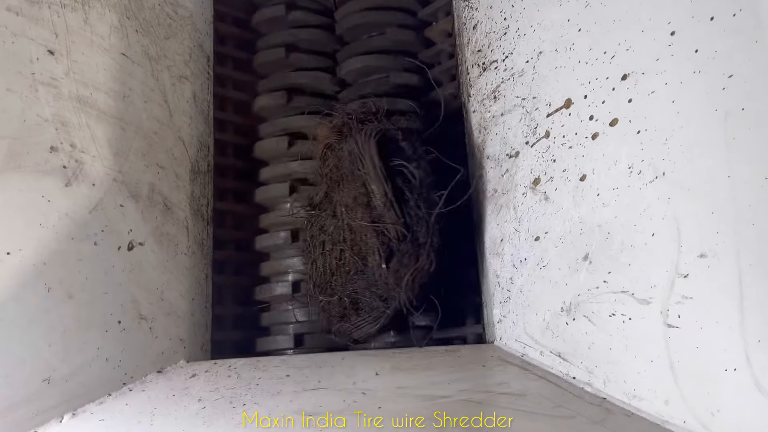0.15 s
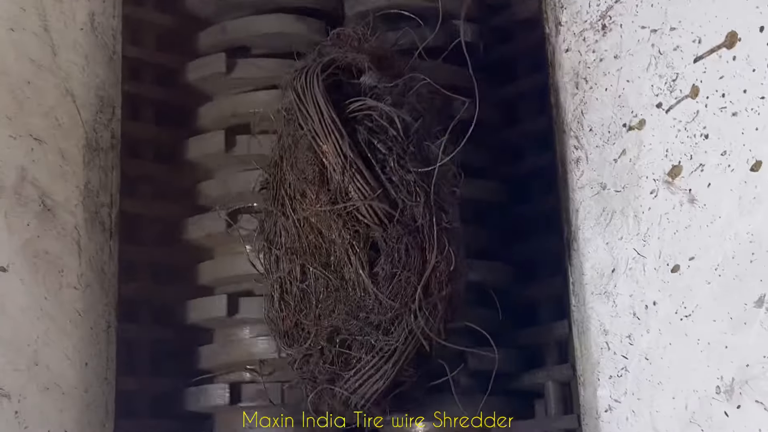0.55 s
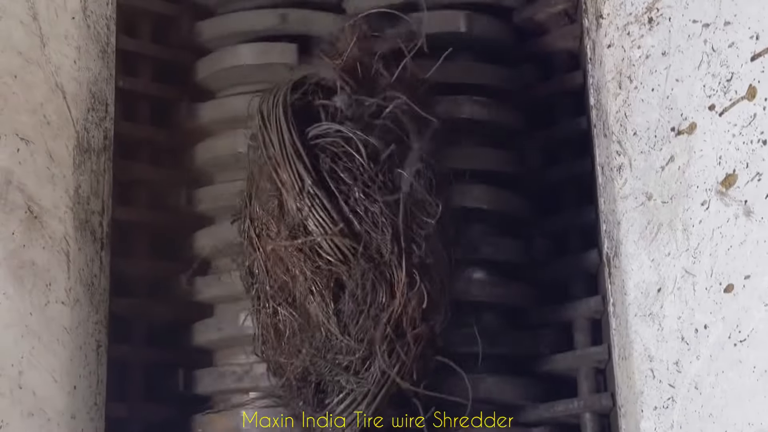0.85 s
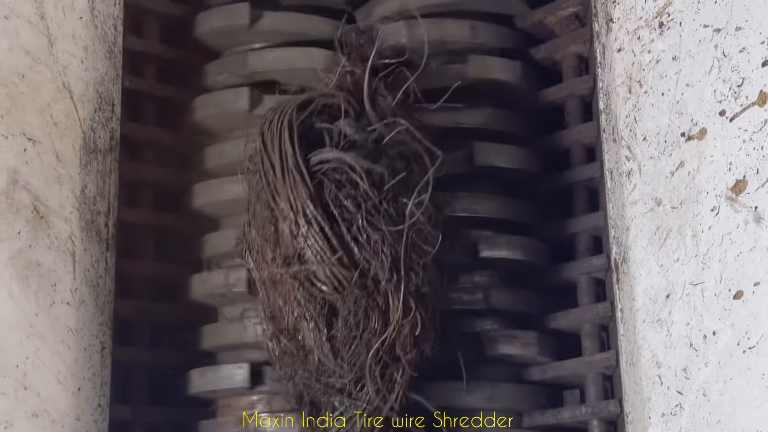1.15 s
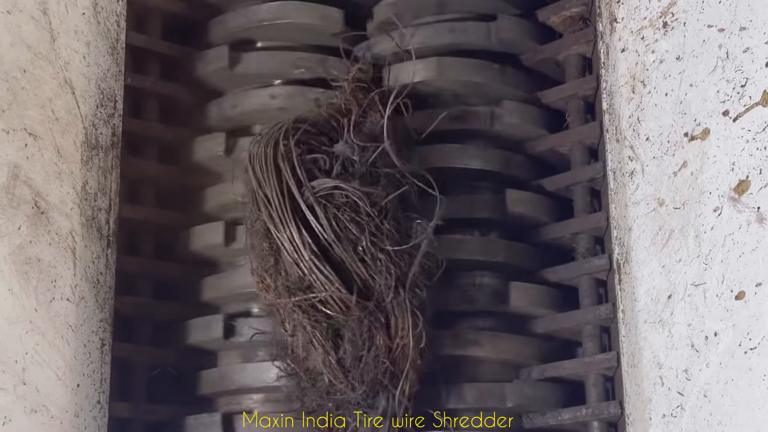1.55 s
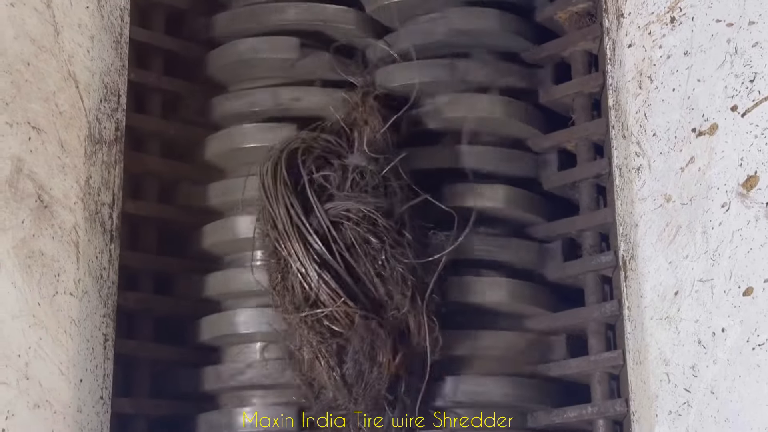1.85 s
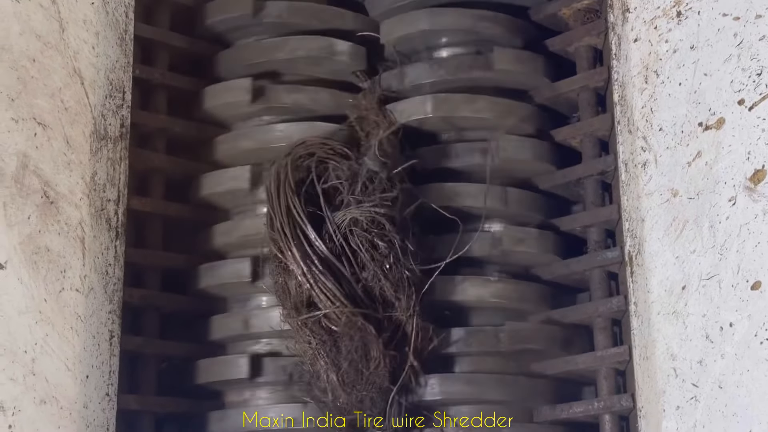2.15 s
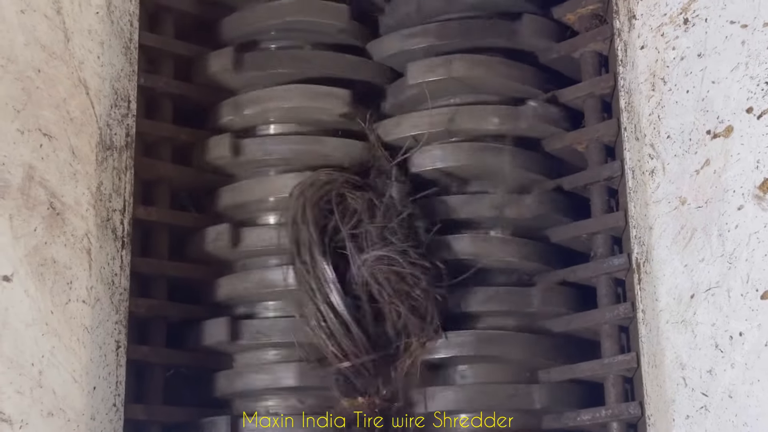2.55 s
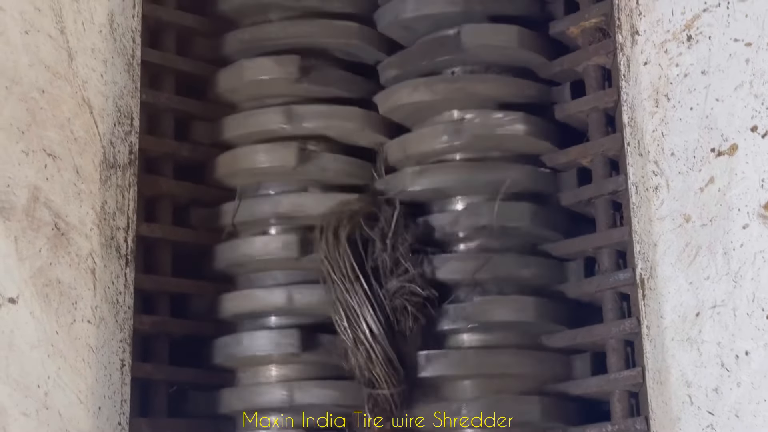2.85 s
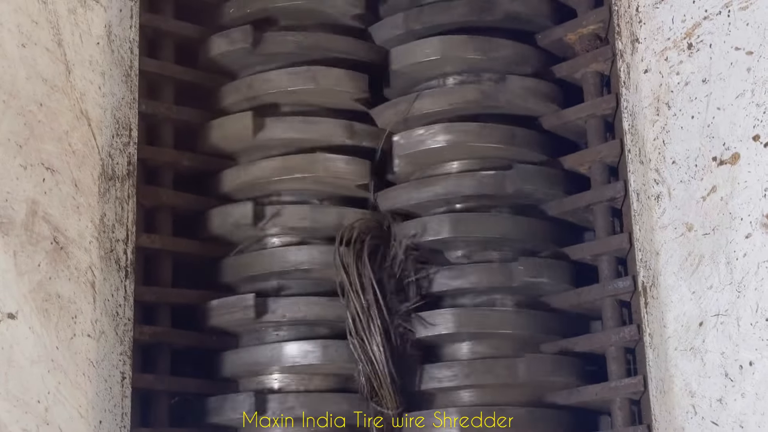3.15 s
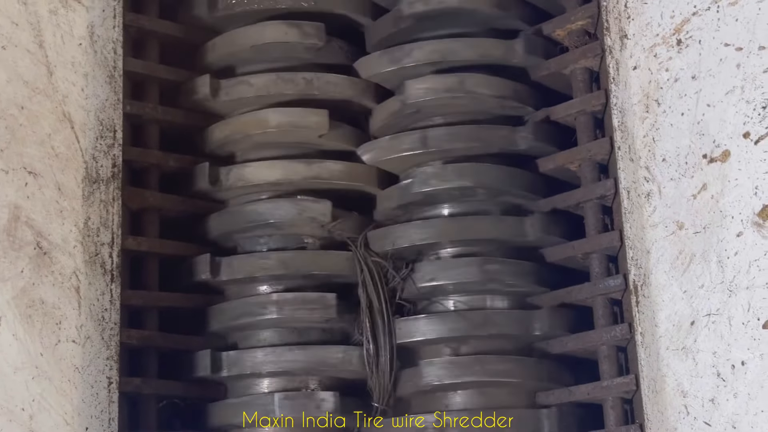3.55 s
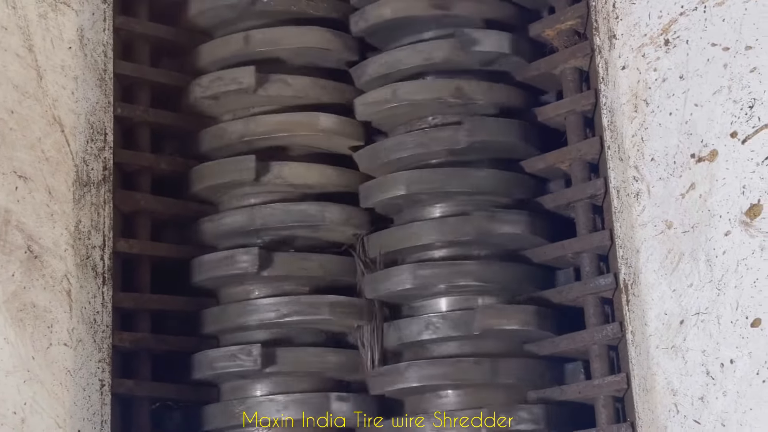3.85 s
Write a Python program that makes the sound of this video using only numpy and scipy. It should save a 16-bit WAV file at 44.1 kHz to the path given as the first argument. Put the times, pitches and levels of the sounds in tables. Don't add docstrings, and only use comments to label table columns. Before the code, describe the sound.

A shredder crushes steel wire, heard close above its hopper in narrow stereo. Gritty bites surge about twice a second, with snaps near 0.6-0.9, a short groan and bright flick at 1.3, and heavy crunches around 1.8 and 2.3. The low hum sags near 2.6. A sharp snap at 2.9 ends the strongest grinding; rumble, thinning hum and faint ticks remain until 4.

```python
import sys
import numpy as np
from scipy import signal
from scipy.fft import rfft, irfft, next_fast_len
from scipy.io import wavfile
from scipy.ndimage import uniform_filter1d

SR = 44100
rng = np.random.default_rng(int(sys.argv[2]) if len(sys.argv) > 2 else 0)


def ratio_of_db(decibels):
    return 10 ** (np.asarray(decibels, float) / 20)


def dump(signal):
    limited = np.clip(np.atleast_2d(signal).T, -1, 1)
    pcm = np.round(limited * 32767).astype(np.int16)
    wavfile.write(sys.argv[1], SR, pcm)


N = 176400


def joined(tables):
    s, *cols = np.transpose([row for table in tables for row in table])
    return [np.interp(np.arange(N) / SR, s, c) for c in cols]


def rms_one(x):
    return x / np.sqrt(np.mean(x ** 2) + 1e-20)


def drift(rate_hz):
    r = np.exp(-80 * np.pi * rate_hz / SR)
    noise = rng.standard_normal(N // 40 + 2002)
    slow = signal.lfilter([1], [1, -2 * r, r * r], noise)[2000:]
    return np.interp(np.arange(N) / 40, np.arange(len(slow)), rms_one(slow))


def band(x, low_hz, high_hz):
    return signal.sosfilt(signal.butter(2, [low_hz, high_hz], "band", fs=SR, output="sos"), x)


def passing(x, low_hz, high_hz):
    size = next_fast_len(N)
    hz = np.arange(size // 2 + 1) * SR / size
    gain = np.clip(np.minimum(hz - low_hz, high_hz - hz) / 150, 0, 1)
    return irfft(rfft(x, size) * gain, size)[..., :N]


def coloured(source, spectrum, patchy_db):
    hz, db = np.transpose(spectrum)
    edges = np.geomspace(hz[0], hz[-1], int(3 * np.log2(hz[-1] / hz[0])) + 1)
    out = np.zeros(N)
    for k, (low, high) in enumerate(zip(edges, edges[1:])):
        band_db = np.interp(np.log(low * high) / 2, np.log(hz), db)
        out += ratio_of_db(band_db + patchy_db * drift(9.6)) * band(source[k % 2], low, high)
    return rms_one(out)


def grains(per_s, spread_db):
    size = ratio_of_db(spread_db * np.minimum(rng.exponential(1, N), 4))
    sign = rng.choice([-1, 1], N)
    return size * sign * (rng.random(N) < per_s / SR) + 1e-18


def ring(x, hz, t60_s):
    r, w = ratio_of_db(-60 / (t60_s * SR)), 2 * np.pi * hz / SR
    return signal.lfilter([0, np.sin(w)], [1, -2 * r * np.cos(w), r * r], x)


# time in seconds, level in dB.
BITE_EFFORT = [
    [(0.0, -22), (0.016, -34), (0.088, -27), (0.096, -33.5), (0.16, -22)],
    [(0.17, -24), (0.23, -17), (0.378, -32.5), (0.46, -33.5)],
    [(0.47, -32.5), (0.54, -29.5), (0.578, -31), (0.66, -29), (0.674, -18.5), (0.74, -20)],
    [(0.75, -20), (0.79, -16.5), (0.882, -35), (0.905, -29.5)],
    [(0.912, -33.5), (0.924, -18.5), (1.044, -35.5), (1.062, -27.5), (1.118, -31), (1.19, -29),
     (1.2, -30.5)],
    [(1.21, -28.5), (1.248, -24.5), (1.268, -17.5), (1.364, -16.5), (1.488, -32.5), (1.6, -33.5)],
    [(1.62, -37.5), (1.84, -14), (1.85, -15.5), (1.864, -24), (1.968, -27), (2.078, -28.5), (2.16, -36)],
    [(2.18, -36.5), (2.3, -24), (2.312, -16), (2.334, -18), (2.398, -20), (2.41, -23), (2.55, -31)],
    [(2.56, -25), (2.642, -37.5), (2.742, -30), (2.75, -35.5), (2.802, -24), (2.85, -29), (2.88, -19.5)],
    [(2.89, -30), (2.898, -17), (2.994, -31.5), (3.184, -45), (3.23, -46), (3.26, -44.5)],
    [(3.27, -40.5), (3.452, -36.5), (3.556, -52), (3.792, -50), (3.796, -48), (3.832, -50.5), (4.0, -40)],
]


def bites():
    return joined(BITE_EFFORT)[0]


# frequency in Hz, density in dB per Hz.
GRIND_COLOUR = [(530, -24), (900, -17), (1010, -4.5), (1210, -3), (2140, -2), (2400, -5), (6180, -11.5),
                (9000, -14), (11700, -31), (19800, -120)]


def grinding(effort_db):
    crush = rms_one(grains(1100 * ratio_of_db(4.8 * drift(30)), 1.4))
    scrape = rng.standard_normal((2, N))
    source = ratio_of_db(-1) * crush + ratio_of_db(-4.5) * scrape
    return ratio_of_db(effort_db) * coloured(source, GRIND_COLOUR, patchy_db=2.0), crush


# frequency in Hz, level in dB, ring time T60 in seconds.
STEEL_MODES = [(382.3, -2.5, 0.3), (470.6, -3.5, 0.3), (570, -10, 0.041), (627.5, -1, 0.082),
               (832.5, -2, 0.093), (933, -12, 0.1), (1252, -15, 0.25), (1877, -8, 0.034),
               (2085, -25.5, 0.046), (2202, -12.5, 0.19), (2640, -16, 0.024)]


def steel(crush, swing_db):
    drive = crush * ratio_of_db(0.86 * swing_db)
    rings = np.zeros(N)
    for hz, db, t60_s in STEEL_MODES:
        struck = drive * ratio_of_db(2.5 * drift(8))
        rings += ratio_of_db(db) * rms_one(ring(struck, hz, t60_s))
    return ratio_of_db(-24.5) * rms_one(rings)


# time in seconds, level
# in dB.
WALL_LEVEL = [(0, 1.5), (.18, -3), (.36, 6), (.6, -1), (.8, 0), (1.05, 3), (1.27, -3), (1.55, 0),
              (1.85, -.5), (2.1, 1), (2.3, -0.5), (2.65, -0.5), (2.95, -1), (3.2, -1), (3.5, 0.5),
              (3.7, 1), (4, 0.5)]


def wall_level():
    return joined([WALL_LEVEL])[0]


# frequency in Hz, density in dB per Hz.
ROAR_COLOUR = [(82, -52.5), (140, -6), (231, -1), (412, -7), (756, -11), (848, -23.5), (1010, -17.5),
               (1400, -24), (1820, -36), (3080, -120)]


def hopper_roar(crush, held_db, wall_db):
    source = rng.standard_normal((2, N)) + ratio_of_db(-5) * crush
    return ratio_of_db(-25.5 + 0.64 * held_db + wall_db) * coloured(source, ROAR_COLOUR, patchy_db=3.0)


# frequency in Hz, density in dB per Hz.
RUMBLE_COLOUR = [(22, -44), (40, -17), (60, -18), (80, -2), (95, 2), (125, -38), (150, -49)]


def drive_rumble(swing_db, hum_db):
    load_db = uniform_filter1d(swing_db, size=4000)
    frame_db = uniform_filter1d(hum_db, size=5000) + 15
    level_db = -21 + 0.6 * load_db + 0.17 * frame_db
    return ratio_of_db(level_db) * coloured(rng.standard_normal((2, N)), RUMBLE_COLOUR, patchy_db=.8)


# frequency in Hz, density in dB per Hz.
HALL_COLOUR = [(120, -54), (200, -47.5), (232, -6), (413, -3.5), (475, 0.5), (855, 4.5), (1800, -33),
               (2340, -42.5), (3960, -120)]


def hall_sound(held_db, wall_db):
    colour = coloured(rng.standard_normal((2, N)), HALL_COLOUR, patchy_db=3.0)
    return ratio_of_db(-36.5 + 0.69 * held_db + wall_db) * colour


# time in seconds, pitch in Hz, level in dB.
HUM_SWELLS = [
    [(0.0, 111.5, -7), (0.068, 108.5, -15), (0.13, 103, -27.5), (0.162, 105.7, -10), (0.202, 109.7, -29),
     (0.238, 110.5, -7), (0.304, 111.4, -5), (0.614, 110.6, -10.5), (0.62, 116.4, -19)],
    [(0.63, 109.3, -18.5), (0.718, 108, -9), (0.786, 110.3, -1.5), (0.798, 109.1, -5), (0.912, 109.7, -3),
     (0.956, 112.4, -17.5), (1.014, 111.1, -3.5), (1.146, 109, -4), (1.21, 103, -20)],
    [(1.22, 108, -28), (1.244, 108.6, -13.5), (1.344, 108.8, -16.5), (1.352, 108.6, -20.5), (1.38, 107, -1),
     (1.444, 114.1, -23.5), (1.462, 110.8, -4.5), (1.798, 111.8, -8.5), (1.83, 111, -19.5)],
    [(1.84, 111.7, -19), (1.872, 112.4, -15), (1.932, 104.8, -16), (1.982, 100.7, -3.5), (2.018, 98.8, -26),
     (2.036, 107.3, -13.5), (2.072, 106.8, -24), (2.14, 107.8, -9.5), (2.28, 111.6, -24)],
    [(2.29, 107.7, -26), (2.352, 107.3, -15.5), (2.504, 101.5, -10), (2.552, 103.4, -34), (2.61, 90.5, -20),
     (2.692, 89.2, -21), (2.764, 97.4, -39), (2.778, 96.6, -41), (2.8, 95.6, -30)],
    [(2.81, 98.6, -51), (2.846, 104.8, -18), (2.888, 110.4, -14), (2.9, 107.3, -8.5), (2.994, 112.2, -11.5),
     (3.014, 116.4, -25), (3.112, 110.2, -13), (3.19, 113, -26), (3.3, 109, -21)],
    [(3.31, 108.5, -22), (3.364, 105.4, -25), (3.368, 108.8, -33), (3.456, 109.5, -11.5),
     (3.528, 111.4, -19), (3.582, 112, -23.5), (3.686, 111.4, -24), (3.92, 111, -34.5), (4.0, 107.5, -39)],
]


def hum():
    hz, db = joined(HUM_SWELLS)
    level = np.sqrt(2) * ratio_of_db(db + 1.8 * drift(25))
    return level * np.sin(2 * np.pi * np.cumsum(hz + drift(10)) / SR), db


# time in seconds, level in dB.
LOOSE_ENDS = [(0, -42.5), (.25, -36.5), (.5, -39.5), (.8, -42.5), (1.1, -41), (1.35, -48.5), (1.6, -43.5),
              (2.05, -48), (2.35, -40.5), (2.6, -52.5), (2.9, -44), (3.2, -46), (3.45, -39), (3.55, -53),
              (3.8, -45), (4, -39)]


def rustle(swing_db):
    level_db, = joined([LOOSE_ENDS])
    ticks = rms_one(grains(1100 * ratio_of_db(3 * drift(30)), 3.2))
    fine = rms_one(ticks + .7 * rng.standard_normal(N))
    ahead = ratio_of_db(-7) * rng.standard_normal(N)
    both = band(np.array([fine, ahead]), 5480, 16700)
    return ratio_of_db(level_db + 7.5 + 0.5 * swing_db + 2 * drift(13)) * both / np.std(both[0])


# start in seconds, peak in dB.
END_FLICKS = [(0.0623, -17), (0.11, -18), (0.1274, -17), (0.1481, -26), (0.187, -13), (0.2667, -13.5),
              (0.4643, -32), (0.4863, -25), (0.5172, -24.5), (0.603, -20), (1.14, -16), (1.1932, -17.5),
              (1.218, -17.5), (1.288, -11), (1.3463, -16), (1.6836, -26), (1.701, -20), (1.7414, -17),
              (1.7828, -22), (2.2295, -18), (2.2647, -20.5), (2.6828, -25), (2.7645, -23), (2.93, -11.5),
              (3.1168, -29), (3.1544, -31), (3.27, -28.5), (3.621, -40)]


def flicks():
    starts, t60_s = np.zeros(N), 0.065
    s, db = np.transpose(END_FLICKS)
    starts[(s * SR).astype(int)] = ratio_of_db(db - 5)
    shape = signal.lfilter([1], [1, -ratio_of_db(-60 / (t60_s * SR))], starts + 1e-18)
    return shape * rms_one(band(rng.standard_normal(N), 2800, 9000))


# middle of the groan in seconds, pitch in Hz, level in dB, length in seconds.
WALL_GROANS = [
    (0.294, 226, -42.5, 0.19),
    (0.762, 263, -48, 0.21),
    (1.312, 235.5, -11, 0.082),
    (1.846, 235.7, -21.5, 0.2),
    (2.337, 212.3, -22, 0.15),
    (2.81, 244, -19, 0.077),
]


def groans():
    out, t = np.zeros(N), np.arange(N) / SR
    sag_hz_per_s, rough = 360, ratio_of_db(3.5 * drift(25))
    for s, hz, db, length_s in WALL_GROANS:
        age = t - s
        swell = ratio_of_db(db) * np.exp(-(2 * age / length_s) ** 2)
        out += swell * np.sin(2 * np.pi * (hz * age - sag_hz_per_s * age ** 2 / 2))
    return np.sqrt(2) * rough * out


# start in seconds, peak in dB, knock minus crack in dB, tick minus crack in dB.
STRAND_SNAPS = [(0.631, -12.5, -22, -30), (0.6708, -12, 4.5, -60), (0.764, -11.5, 6.5, -30),
                (0.9093, -6, -10, -25), (1.062, -31, 12.5, 11), (1.264, -14.5, -13, -34),
                (1.8218, -8.5, -5.5, -39), (1.8637, -6.5, -18.5, -51), (2.3096, -13.5, 4, -34),
                (2.359, -6.5, -24, -26), (2.3938, -9.5, -10, -38), (2.5614, -26, 24, -40),
                (2.805, -17, -11, -35), (2.893, -6.5, -3.5, -30), (3.729, -33, -16, -13),
                (3.766, -25.5, -10, -15.5), (3.7962, -29, -2, -18), (3.9618, -21.5, -1, -36)]


def snaps():
    shapes, t = np.zeros((3, N)), np.arange(N) / SR
    t60_s = np.array([[0.1], [0.072], [0.028]])
    for s, db, knock_db, tick_db in STRAND_SNAPS:
        i = int(s * SR)
        age = t[:min(N - i, SR // 4)]
        start_db = db + np.array([[-8.5], [knock_db - 7], [tick_db + 12]])
        hurry = ratio_of_db(-0.77 * (db + 18.5))
        shapes[:, i:i + len(age)] += ratio_of_db(start_db - 60 * age * hurry / t60_s)
    out = np.zeros(N)
    for shape, (low_hz, high_hz) in zip(shapes, [(1390, 7400), (350, 774), (8100, 8300)]):
        out += shape * rms_one(band(rng.standard_normal(N), low_hz, high_hz))
    return out


def delayed(x, lag_s):
    size = next_fast_len(N + 64)
    hz = np.arange(size // 2 + 1) * SR / size
    return irfft(rfft(x, size) * np.exp(-2j * np.pi * hz * lag_s), size)[:N]


def scene():
    effort_db, wall_db = bites(), wall_level()
    swing_db = effort_db - effort_db.mean()
    fade_db = 78.5 * np.arange(N) / SR
    held_db = np.maximum.accumulate(swing_db + fade_db) - fade_db
    grind, crush = grinding(effort_db)
    frame_hum, hum_db = hum()
    fine, ahead = rustle(swing_db)
    direct = grind + ratio_of_db(wall_db) * steel(crush, swing_db)
    direct += hopper_roar(crush, held_db, wall_db) + drive_rumble(swing_db, hum_db)
    direct += frame_hum + fine + flicks() + groans() + snaps()
    late = delayed(direct, 4.5e-5)
    hall = hall_sound(held_db, wall_db)
    hall += ratio_of_db(-1.5) * band(late - direct, 320, 1200) - ratio_of_db(-44) * band(direct, 1000, 1200)
    return np.array([late + hall + ahead, direct - hall + ahead])


def roll_off(x):
    return signal.sosfilt(signal.butter(12, 17030, fs=SR, output="sos"), x)


def weak_blocks(rate_hz, often):
    return drift(rate_hz)[np.arange(N) // 1024 * 1024] < often


# low edge in Hz, high edge in Hz, how often as a threshold (higher is more).
SUM_GAPS = [(9000, 9700, -1), (9700, 10400, .7), (10400, 13200, 9), (13200, 13900, .9), (13900, 14700, -.9)]
WHOLE_TIMES = [.005, .915, 1.068, 2.885, 3.73, 3.8]


def record(dry):
    left, right = dry / (1 + (dry / 1.02) ** 4) ** .25
    mid, side = passing(np.array([left + right, left - right]) / 2, 0, 15850)
    t = np.arange(N) / SR
    whole = np.min(np.abs(t[:, None] - WHOLE_TIMES), axis=1) < .011

    def soft(gate):
        return uniform_filter1d(gate * ~whole * 1., size=300)

    lost = np.zeros(N)
    for low, high, often in SUM_GAPS:
        lost += passing(mid, low - 75, high + 75) * soft(weak_blocks(16, often))
    mid = mid - lost
    side = side - 0.46 * passing(side, 5000, 10400)
    low, edge, high = 1550, 4300, 5400
    gap = passing(side, low, edge + 75)
    gap += passing(side, edge - 75, high) * soft(t > 0)
    gap += passing(side, high - 150, high + 600) * soft(weak_blocks(12, .3))
    side = side - np.clip((t - .375) / .02, 0, 1) * gap
    return roll_off(np.array([mid + side, mid - side]))


dry = scene()
out = record(dry)
dump(out)
```